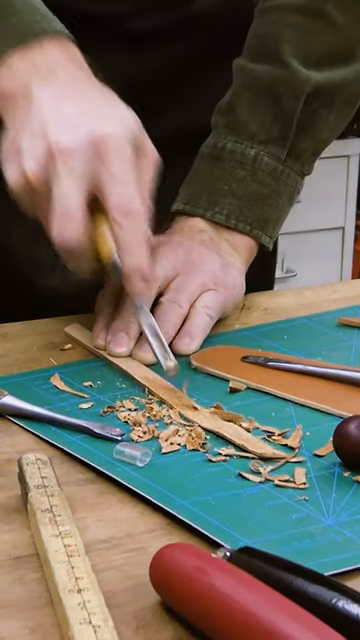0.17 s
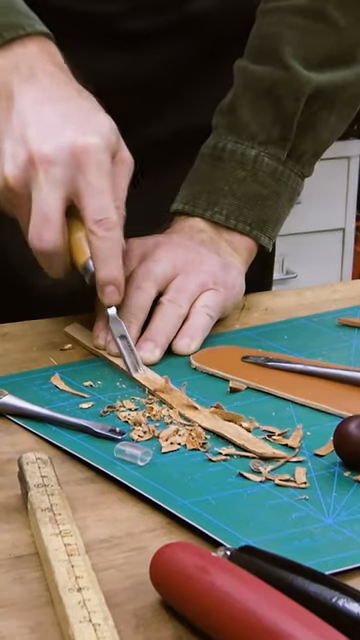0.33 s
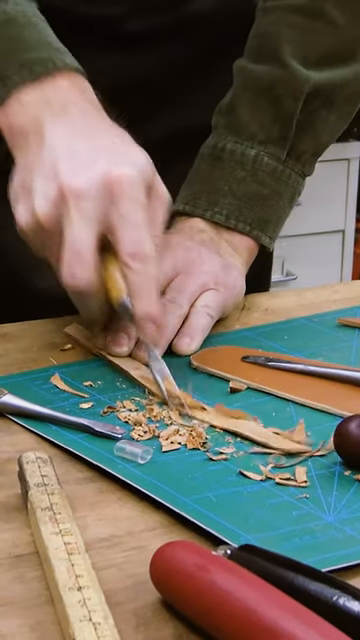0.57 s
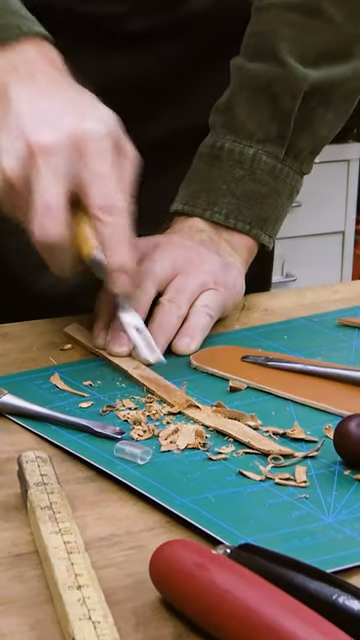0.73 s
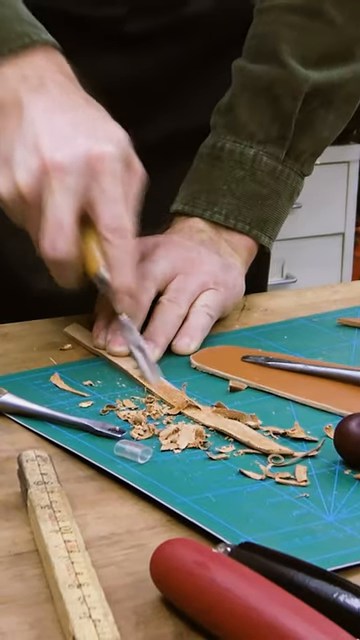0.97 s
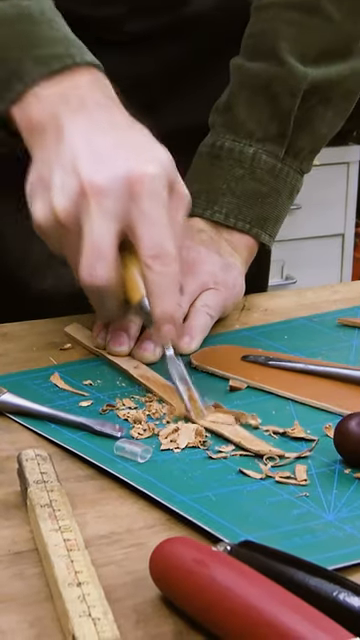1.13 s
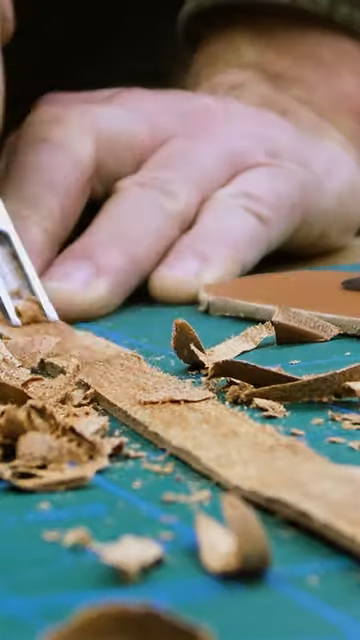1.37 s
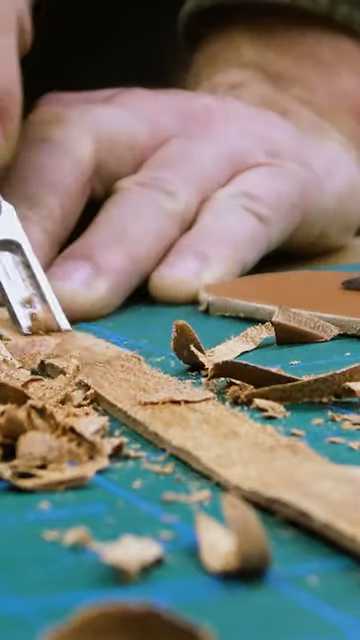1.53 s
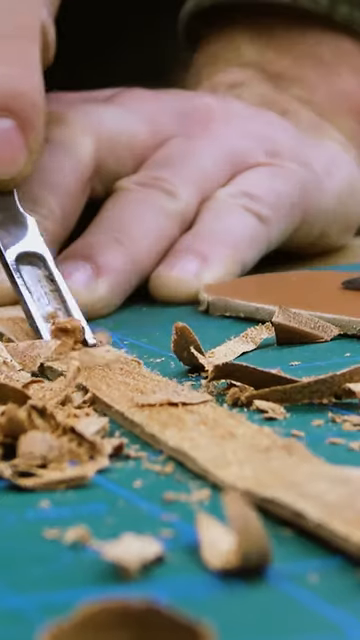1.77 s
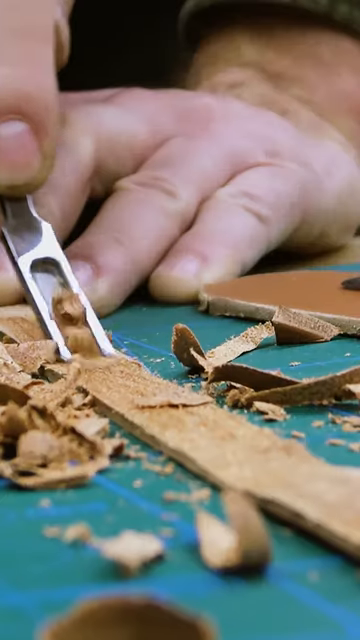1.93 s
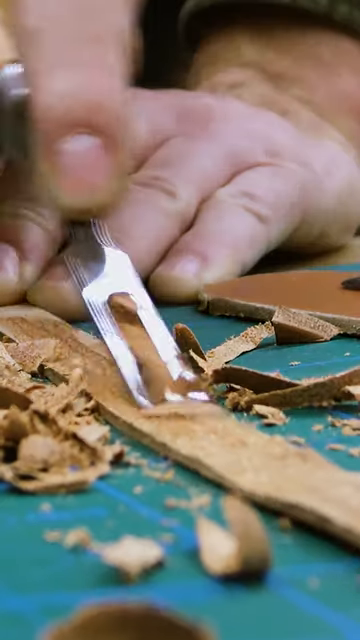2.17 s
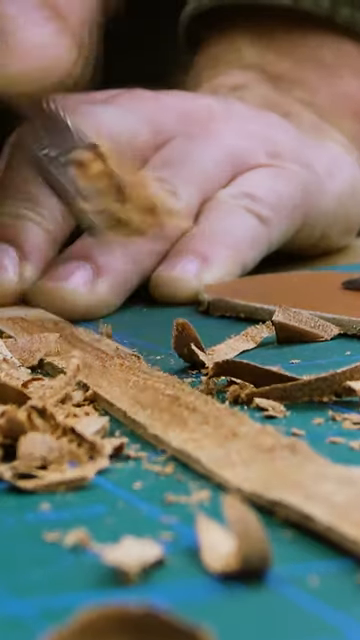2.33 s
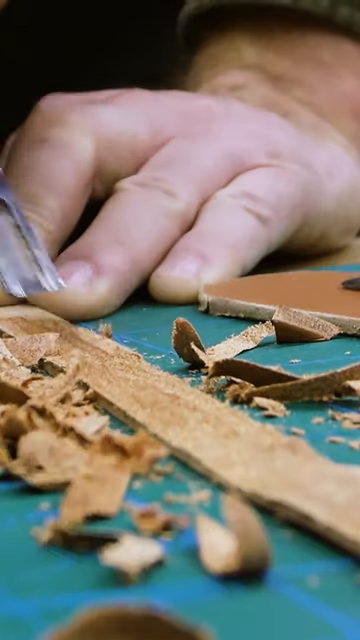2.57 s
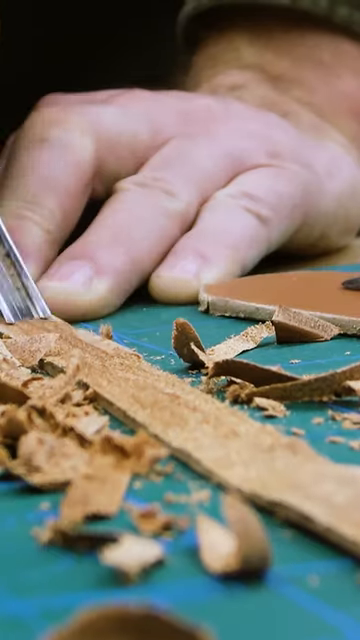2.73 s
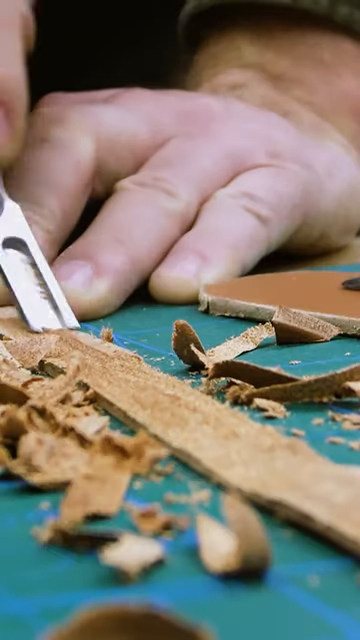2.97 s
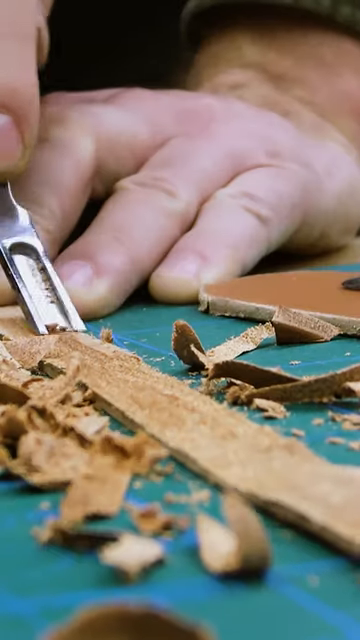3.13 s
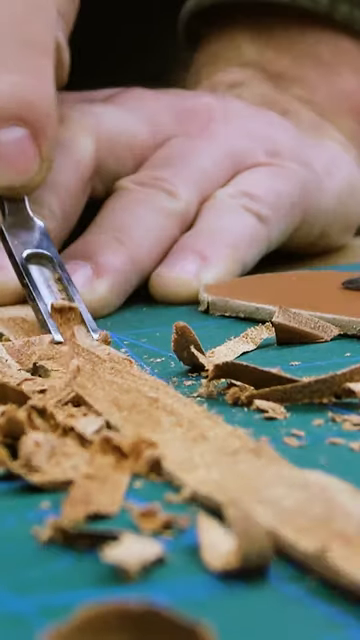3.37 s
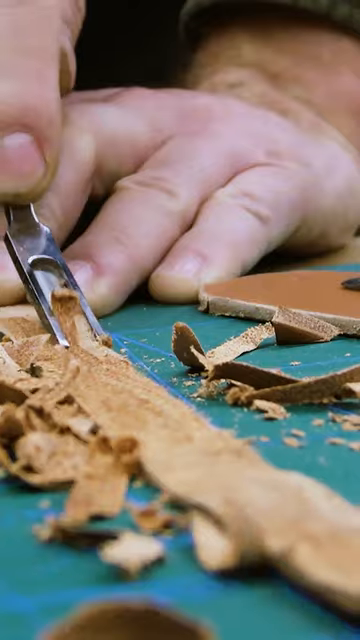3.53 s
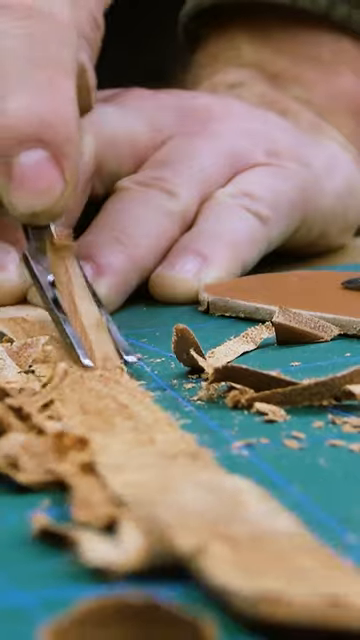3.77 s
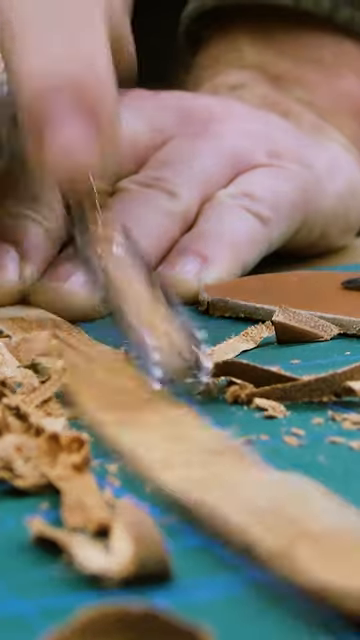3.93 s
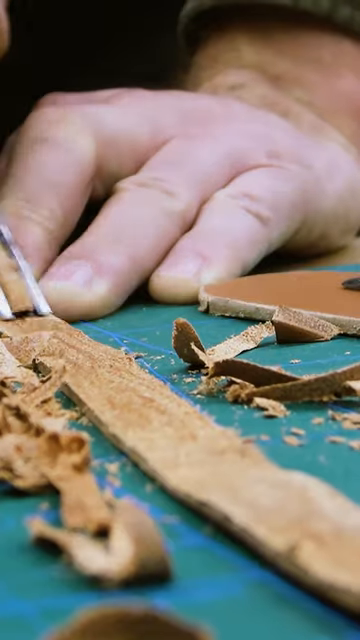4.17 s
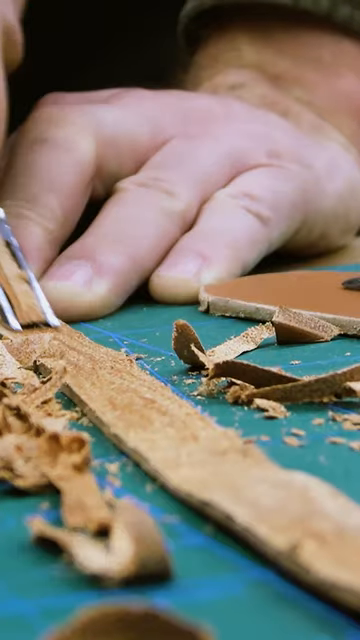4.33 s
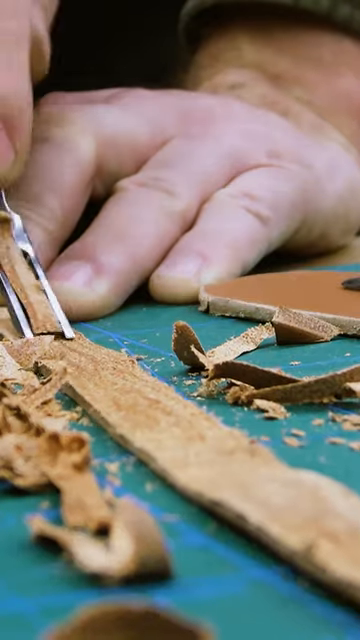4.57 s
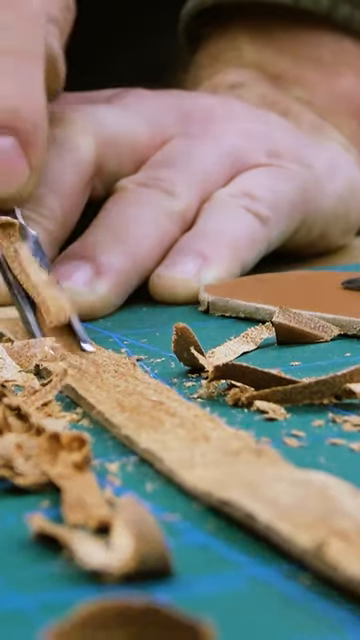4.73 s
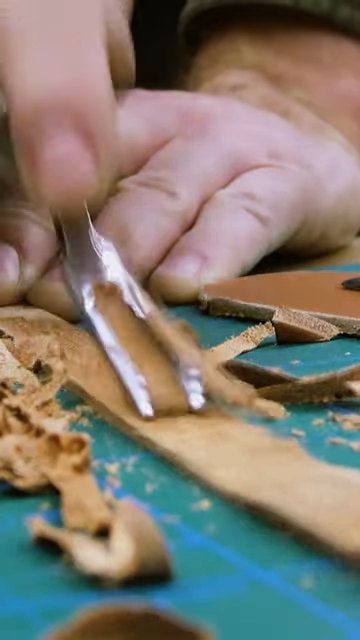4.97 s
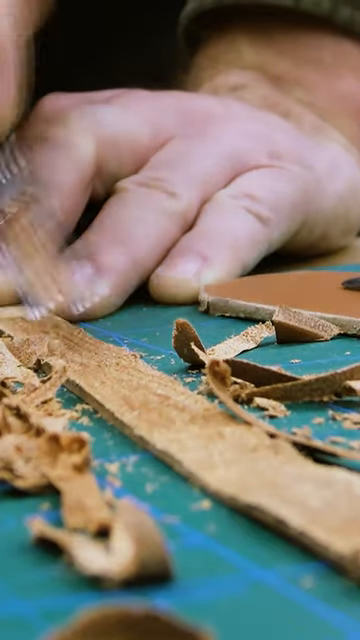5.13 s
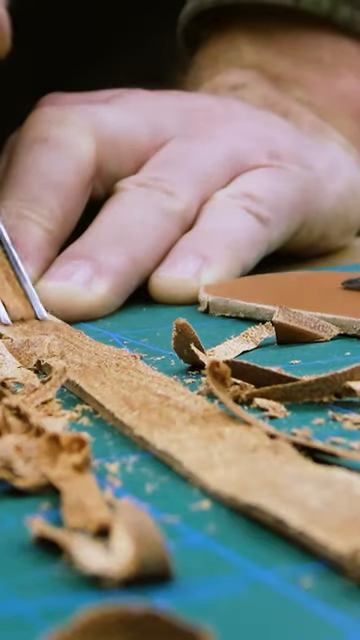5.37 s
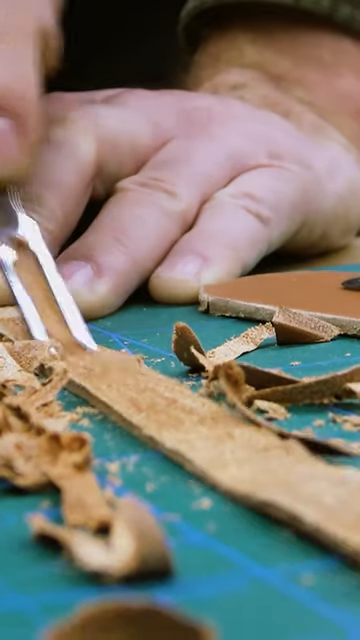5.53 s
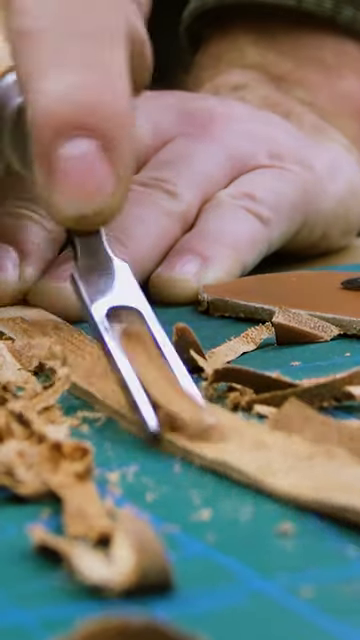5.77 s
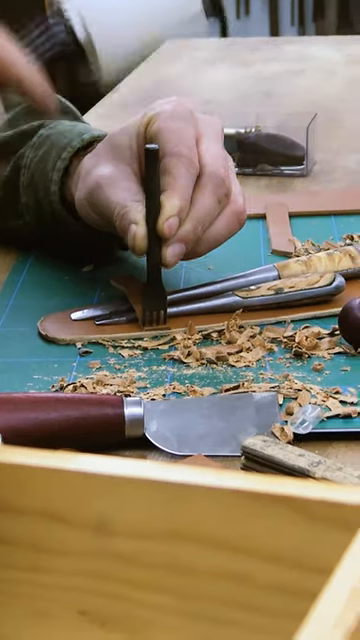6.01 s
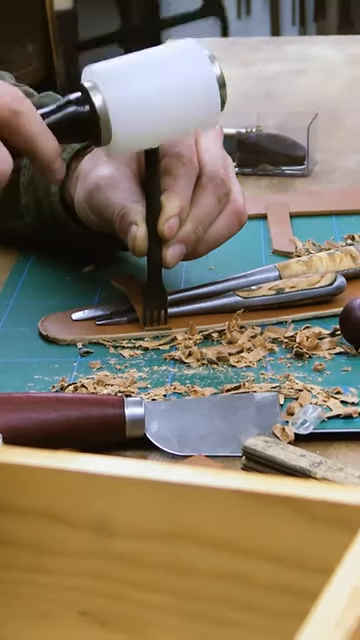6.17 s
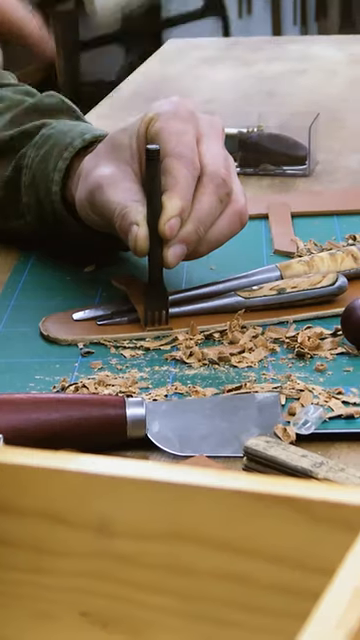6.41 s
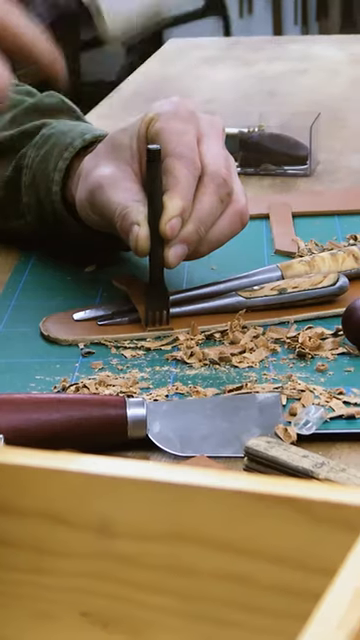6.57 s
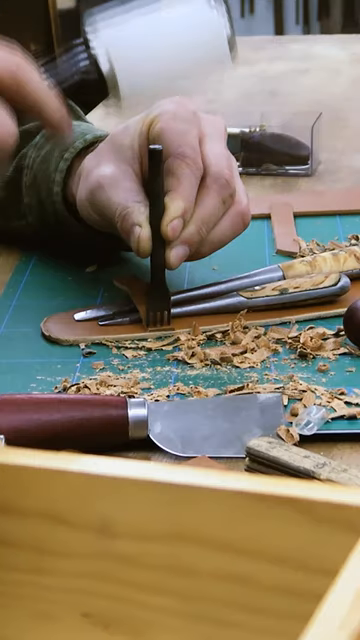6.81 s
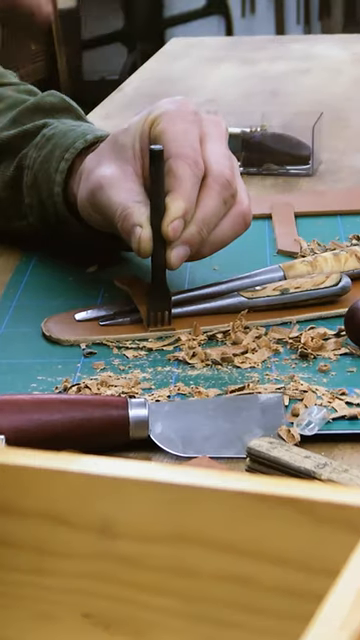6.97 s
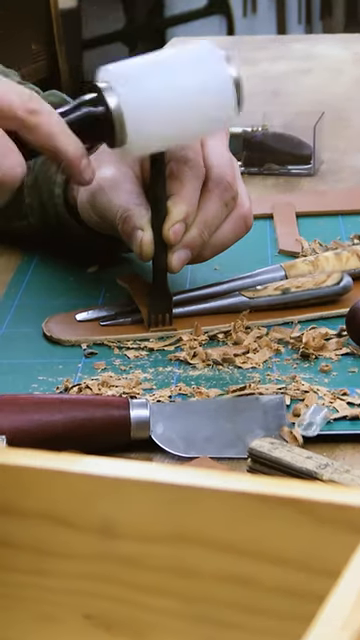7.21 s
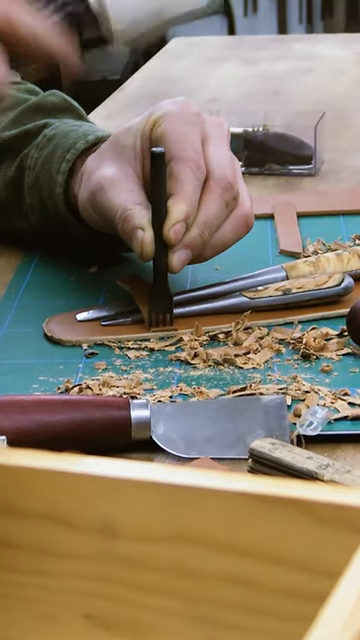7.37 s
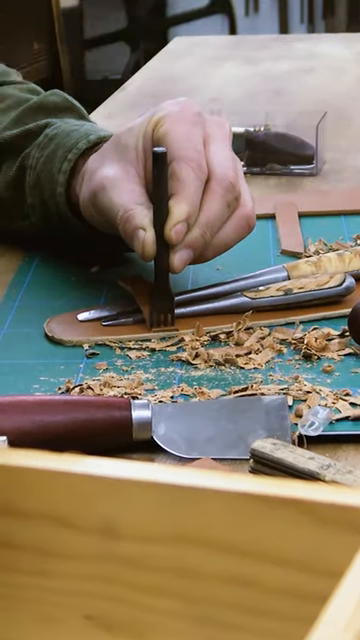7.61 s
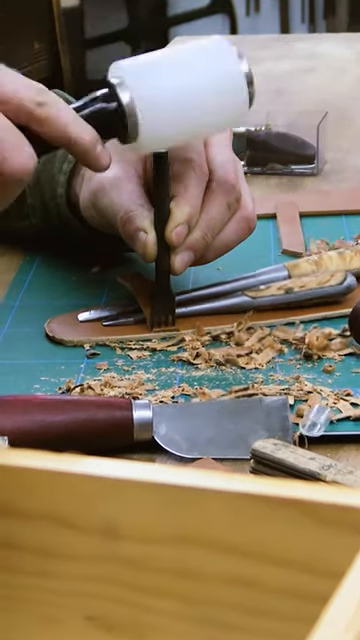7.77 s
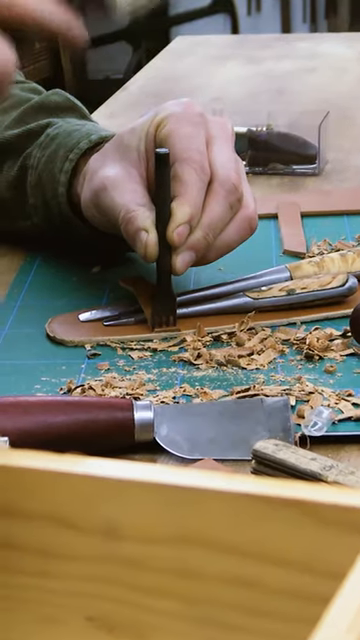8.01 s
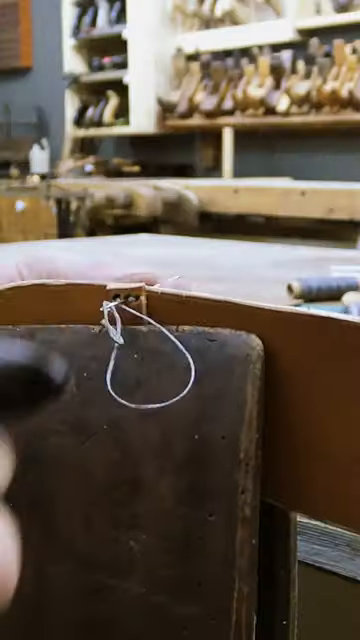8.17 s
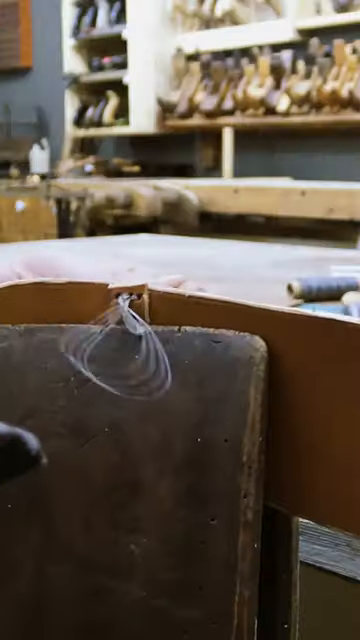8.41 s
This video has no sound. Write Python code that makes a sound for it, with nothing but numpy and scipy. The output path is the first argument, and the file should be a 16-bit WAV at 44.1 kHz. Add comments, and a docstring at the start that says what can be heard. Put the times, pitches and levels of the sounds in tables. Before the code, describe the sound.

Dry scraping cuts through leather on a mat, each closely doubled, followed by four growing mallet knocks on a punch with ringing loose steel.

```python
"""A hand blade shaves a leather strap on a cutting mat in seven strokes, once dragging back lightly,
then a mallet drives a steel punch four times and loose tools jump on the bench. Slipping grains of noise
excite resonances for the blade; shaped noise and decaying sines make the blows; steel rings in sines.
Four sections of a quiet workshop follow one another; two microphones are mixed, the second about 52 ms
late, so every sound comes twice; gain control and a limiter hold the blows."""
import sys
import numpy as np
from scipy import signal
from scipy.fft import rfft, irfft, next_fast_len
from scipy.io import wavfile
from scipy.ndimage import uniform_filter1d, minimum_filter1d, map_coordinates

SR = 44100
rng = np.random.default_rng(int(sys.argv[2]) if len(sys.argv) > 2 else 0)


def wrap_up_sound(samples):
    """Save the sound to the file named by the first command line argument, as 16-bit audio."""
    columns = np.atleast_2d(samples).T
    # keep every value between -1 and 1, then stretch to whole-number steps
    tamed = np.clip(columns, -1, 1)
    steps = np.round(tamed * 32767).astype(np.int16)
    wavfile.write(sys.argv[1], SR, steps)


def gain_from_db(level_db):
    """Turn a decibel level (scalar or array-like) into a linear amplitude factor."""
    decades = np.asarray(level_db, float) / 20
    return 10 ** decades


N = 371763
T = np.arange(N) / SR  # seconds

# Sections of the scene. Each row: start in seconds, lag of the second microphone in ms.
SECTIONS = [(0, 51.7), (1.36, 53.2), (6.09, 52), (8.24, 52)]


def unit(x):
    """Normalization: scales a signal to rms 1."""
    return x / np.sqrt(np.mean(x ** 2) + 1e-20)


def along(points, hz):
    """Logarithmic interpolation: reads (Hz, value) points on a log frequency axis."""
    point_hz, value = np.transpose(points)
    return np.interp(np.log(hz + 1), np.log(point_hz + 1), value)


def filtered(x, response):
    """Linear filtering: multiplies the spectrum by a complex response of frequency."""
    size = next_fast_len(len(x) + 8192)
    spectrum = rfft(x, size) * response(np.fft.rfftfreq(size, 1 / SR))
    return irfft(spectrum, size)[:len(x)]


def resonances(peaks):
    """Modal superposition: causal response of (Hz, width in Hz, dB) resonances of alternating sign."""
    def response(f):
        return sum((-1) ** k * gain_from_db(db) * 1j * f * width / (centre ** 2 - f * f + 1j * f * width)
                   for k, (centre, width, db) in enumerate(peaks))
    return response


def causal(gain):
    """Minimum phase: the folded cepstrum of a gain sampled up to SR / 2 gives its impulse."""
    cepstrum = irfft(np.log(gain + 1e-6))
    half = len(cepstrum) // 2
    cepstrum[1:half] *= 2
    cepstrum[half + 1:] = 0
    return irfft(np.exp(rfft(cepstrum)))[:half]


def add(track, s, sound):
    """Superposition: mixes a sound into the track at s seconds."""
    part = track[round(s * SR):][:len(sound)]
    part += sound[:len(part)]


def ring(modes, scatter_db):
    """Free vibration: exponentially decaying sines, their strengths scattered at random."""
    t = T[:SR]
    return sum(gain_from_db(db + rng.normal(0, scatter_db) - 60 * t / t60) * np.sin(2 * np.pi * hz * t)
               for hz, db, t60 in modes)


def room_tone():
    """Stationary background: Gaussian noise shaped to the spectrum of the quiet workshop."""
    # Spectrum of the room tone. Each row: frequency in Hz, relative level in dB.
    tone_points = [(15, -49), (25, -11), (84, -4), (116, -6), (144, -5), (205, -4.5), (1150, -9),
                   (1470, -11.5), (2890, -16), (5370, -17.5), (15800, -27.5)]
    return unit(filtered(rng.standard_normal(N), lambda f: gain_from_db(along(tone_points, f))))


def room(x, wet_db):
    """Reverberation: direct sound plus noise tails in which each frequency dies at its own speed."""
    # Decay of the room. Each row: frequency in Hz, t60 in seconds.
    decay = [(80, 0.64), (300, .5), (1500, 0.38), (5000, 0.3), (12000, 0.2)]
    out = x.copy()
    block = round(.555 * SR)  # a fresh random tail for each block, so blows do not share one colour
    for start in range(0, N, block):
        source = x[start:start + block]
        if not source.any():
            continue
        hz, t, noise = signal.stft(rng.standard_normal(SR), SR, nperseg=256)
        decay_db = -60 * t / along(decay, hz)[:, None]
        soaked_db = 14 * (hz[:, None] / 12000) ** 2  # the treble is soaked up
        tail = signal.istft(noise * gain_from_db(decay_db - soaked_db), SR, nperseg=256)[1]
        tail *= 1 - np.exp(-np.arange(len(tail)) / SR / 0.0029)  # gradual onset
        add(out, start / SR, gain_from_db(wet_db) * signal.fftconvolve(source, tail / np.linalg.norm(tail)))
    return out


def taps():
    """Impact excitation: small dry contacts, each a short scrape of noise through one steep resonance."""
    # Taps of blade and shavings on the mat. Each row: start in seconds, peak of the dry tap in dB,
    # resonance in Hz, its width in Hz, t60 of the scrape in seconds.
    contacts = [(0.175, -31.5, 5150, 1110, .12), (.634, -8, 1680, 690, 0.0044),
                (.635, -18, 5200, 1600, 0.0044), (0.79, -35, 4930, 1100, 0.11),
                (0.918, -27, 1460, 600, 0.0058), (2.349, -23, 1470, 450, 0.01),
                (2.756, -37.5, 1420, 800, .004), (4.204, -29.5, 1430, 895, 0.0051),
                (5.03, -28, 1500, 500, .007), (5.93, -35, 1580, 597, 0.2), (5.99, -41, 2020, 595, .12),
                (8.172, -38, 6640, 2200, 0.0076), (8.192, -32, 5970, 2210, 0.0085)]
    out, t = np.zeros(N), T[:SR // 5]
    for s, db, hz, width, t60 in contacts:
        scrape = gain_from_db(-60 * t / t60) * rng.standard_normal(len(t))
        narrow, wide = resonances([(hz, width, 0)]), resonances([(hz, 3 * width, 0)])
        tap = filtered(scrape, lambda f: narrow(f) * wide(f) ** 2)
        add(out, s, gain_from_db(db) * tap / abs(tap).max())
    return out


def clinks():
    """Modal ringing: the jolted steel lands and rings at its own lightly damped frequencies."""
    # Three loose steel tools and the punch, a list of modes for each.
    # Each row: frequency in Hz, level in dB, t60 in seconds.
    steel = [
        [(6422, 0, .18), (8070, -3, .27)],
        [(8349, 0, .3)],
        [(4716, 0, .5), (7682, -7, .3)],
        [(11500, 0, .8), (11680, -1, 1.1)],
    ]
    # Landings of each piece after a jolt, a list for each. Each row: start in seconds, level in dB.
    landings = [
        [(6.184, -40), (6.748, -32.5), (7.265, -26), (7.87, -46)],
        [(6.748, -56), (7.265, -18.5), (7.87, -28.5)],
        [(7.3, -40), (7.376, -34), (8.0, -57)],
        [(6.748, -62), (7.265, -47), (7.376, -66)],
    ]
    out = np.zeros(N)
    for modes, times in zip(steel, landings):
        for s, db in times:
            add(out, s, gain_from_db(db) * ring(modes, scatter_db=0))
    return out


def mallet():
    """Impact radiation: a crack, a knock through punch and bench, rattling objects and low modes."""
    # Mallet blows. Each row: start in seconds, strength in dB, brightness in dB per octave,
    # clack of the punch in Hz, height of the clack in dB.
    blows = [(6.172, 1.5, -3, 2220, 4), (6.724, 12, -3.5, 1410, 0.5), (7.217, 22.5, -2, 3220, 6.5),
             (7.813, 26, -2.2, 2570, 6.5)]
    # Spectrum of the knock. Each row: frequency in Hz, relative level in dB.
    knock_points = [(29, -47), (50, -33.5), (253, -8.5), (292, -4), (460, -5.5), (598, -3.5), (643, -4),
                    (742, -3), (1630, -9), (3030, -16.5), (5770, -26), (8260, -29.5), (15000, -53)]
    # Spectrum of the crack. Each row: frequency in Hz, relative level in dB.
    crack_points = [(300, -30.5), (1200, -2.5), (2500, 3), (6000, -7), (15000, -20)]
    # Low modes of bench and room. Each row: frequency in Hz, mean relative level in dB, t60 in seconds.
    boom = [(72, -17.5, 0.87), (114, -15, 0.57), (165.4, -7.5, 0.24), (192.7, -12, 0.34),
            (222.6, -9.5, 0.34), (283.8, -9.5, 0.42), (356, -12, 0.3)]
    out, hz, t = np.zeros(N), np.fft.rfftfreq(4096, 1 / SR), T[:SR // 2]
    jingle_db = 7 * np.exp(-(np.log2((hz + 1) / 7000) / 0.38) ** 2)  # small steel shaking on the bench
    for s, db, bright_db, clack_hz, clack_db in blows:
        tilt_db = bright_db * np.log2((hz + 1) / 700)
        clack = clack_db * np.exp(-(np.log2((hz + 1) / clack_hz) / 0.24) ** 2)
        knock = causal(gain_from_db(along(knock_points, hz) + tilt_db + clack + jingle_db))
        # a click, then noise with a fast and a slow decay
        rattle = (gain_from_db(-23.5 - 60 * t / 0.28) + gain_from_db(-15 - 60 * t / 0.027)) * rng.standard_normal(len(t))
        rattle[0] = 1
        snap = gain_from_db(-60 * t / .009) * rng.standard_normal(len(t))
        # brightness shapes the crack more steeply than the knock
        crack = causal(gain_from_db(along(crack_points, hz) + 2.82 * tilt_db + 1.5 * clack))
        add(out, s, gain_from_db(db) * signal.fftconvolve(rattle, knock / np.linalg.norm(knock)))
        # crack and low modes grow less than the knock
        add(out, s, gain_from_db(0.62 * db - 3.5) * signal.fftconvolve(snap, crack / np.linalg.norm(crack)))
        add(out, s, gain_from_db(0.61 * db - 21) * ring(boom, scatter_db=2.5))
    return out


def slips(spread_db, chatter_db, chatter_rate):
    """Stick-slip friction: grains of uneven size, in clumps as the edge chatters (rate in knots per s)."""
    knots = rng.standard_normal(N)
    chatter = map_coordinates(knots, [T * chatter_rate])
    grains, sizes = rng.standard_normal((2, N))
    return grains * gain_from_db(spread_db * sizes + chatter_db * chatter)


def pressure_db(stroke, t, touch_db_s, lift_db_s):
    """Contact force: the curve of a stroke, with its build-up before and its release after."""
    s, db = np.transpose(stroke)
    build_up = touch_db_s * np.maximum(s[0] - t, 0)
    release = lift_db_s * np.maximum(t - s[-1], 0)
    return np.interp(t, s, db) - build_up - release


def skiving():
    """Friction-driven resonance: the slipping edge rumbles the bench, tears fibres, makes the blade sing."""
    # Strokes, each a list from touch-down to lift-off.
    # Each row: time in seconds, pressure of the edge as bench rumble in dB.
    strokes = [
        [(0, -25), (.06, -24), (.085, -30.5)],
        [(.49, -32), (.575, -24.5), (.615, -29)],
        [(1.065, -26), (1.13, -30)],
        [(1.485, -39), (1.66, -32.5), (1.755, -29.5), (1.8, -35), (1.99, -30.5), (2.12, -31), (2.24, -30),
         (2.3, -37.5)],
        [(2.955, -38.5), (3.05, -36.5), (3.11, -45.5), (3.19, -44), (3.23, -38.5), (3.46, -37), (3.785, -28),
         (3.87, -32)],
        [(4.42, -41), (4.56, -41.5), (4.72, -29), (4.86, -24.5), (4.92, -28.5)],
        [(5.15, -56.5), (5.33, -60)],
        [(5.46, -39.5), (5.63, -29), (5.765, -27), (5.87, -53), (6.0, -54)],
    ]
    # Make-up of each stroke. Each row: tearing fibres in dB and blade hiss in dB over the bench rumble
    # at a firm push, touch-down in dB per second, lift-off in dB per second.
    cuts = [(-9, -16.5, 200, 298), (-8.5, -15.5, 189, 327), (-8, -16, 195, 266), (-11, -16, 217, 260),
            (-12.5, -19.5, 309, 205), (-10, -13.5, 200, 220), (-14, -29, 200, 200), (-8.5, -16.5, 231, 206)]
    # Mat and bench under the blade, in the first section and in the others.
    # Each row: resonance in Hz, width in Hz, relative level in dB.
    bench_far = [(260, 160, -7.5), (344, 97, 0.5), (722, 170, 0.5), (1010, 89, 1.5), (1216, 120, -0.5),
                 (1500, 130, -4.5), (1850, 160, -16.5)]
    bench_near = [(69, 17, -16), (151, 78, -6), (368, 97, -2.5), (691, 148, -1.5), (1030, 148, -3),
                  (1284, 136, -6.5), (1552, 108, -6)]
    # Spectrum of tearing fibres. Each row: frequency in Hz, relative level in dB.
    fibre_points = [(1200, -0.5), (2000, 0), (3000, -3.5), (4200, -6.5), (5500, -16), (9000, -16),
                    (14000, -32)]
    # Resonances of the blade. Each row: frequency in Hz, width in Hz, relative level in dB.
    blade_peaks = [(5950, 1050, 5), (7300, 560, 6.5), (8300, 160, 2), (10500, 1900, -39)]
    # The edge sticks and the blade's singing dips.
    # Each row: centre in seconds, half-length in seconds, depth in dB.
    sticks = [(1.586, 0.04, 18), (1.787, .04, 16), (2.248, 0.12, 5), (3.102, 0.063, 18), (3.892, 0.042, 12),
              (4.53, .04, 10), (4.92, 0.073, 8), (5.843, 0.094, 3)]
    firm_db = -32
    fibres_grow, blade_grows = 1.12, 1.04  # dB per dB of pressure, around a firm push
    fibres_lag_s, blade_lead_s = 0.0061, 0.0083  # the blade sings as it bites and is silent first

    push = slips(spread_db=5.5, chatter_db=3.0, chatter_rate=60)
    far = unit(filtered(push, resonances(bench_far)))
    near = unit(filtered(push, resonances(bench_near)))
    bench = np.where(T < SECTIONS[1][0], far, near)

    tearing = slips(spread_db=4.5, chatter_db=2.5, chatter_rate=70)
    fibres = unit(filtered(tearing, lambda f: gain_from_db(along(fibre_points, f))))

    song = slips(spread_db=5, chatter_db=4, chatter_rate=40)
    blade = unit(filtered(song, lambda f: resonances(blade_peaks)(f) * f / (f + 9000)))
    blade = blade * gain_from_db(-sum(db * np.exp(-((T - s) / length) ** 4) for s, length, db in sticks))

    out = np.zeros(N)
    for stroke, (fibre_db, blade_db, *rates) in zip(strokes, cuts):
        fibre_push = pressure_db(stroke, T - fibres_lag_s, *rates) - firm_db
        blade_push = pressure_db(stroke, T + blade_lead_s, *rates) - firm_db
        out += bench * gain_from_db(pressure_db(stroke, T, *rates))
        out += fibres * gain_from_db(fibre_db + firm_db + fibres_grow * fibre_push)
        out += blade * gain_from_db(blade_db + firm_db + blade_grows * blade_push)
    return out


def ducking_db(x, top_db, hold, release_db_s):
    """Peak control: gain that keeps peaks under the top and climbs back at a fixed rate."""
    need = np.minimum(top_db - 20 * np.log10(abs(x) + 1e-9), 0)
    ramp = release_db_s * T
    return np.minimum.accumulate(minimum_filter1d(need, hold) - ramp) + ramp


def limited(x, top_db, ahead_ms, release_db_s):
    """Look-ahead limiting: the gain drops just before a peak."""
    size = round(ahead_ms * SR / 1000)
    return x * gain_from_db(uniform_filter1d(ducking_db(x, top_db, 2 * size + 1, release_db_s), size))


def microphone(x, top_db, react_ms, release_db_s):
    """Delayed gain control and saturation: it reacts late, so the front of a blow clips softly."""
    late = max(round(react_ms * SR / 1000), 1)
    gain_db = uniform_filter1d(ducking_db(x, top_db, 3, release_db_s), size=21)
    over = x * gain_from_db(np.pad(gain_db, (late, 0))[:N] - top_db)  # 1 = the top
    clipped = gain_from_db(top_db) * over / (1 + over ** 4) ** (1 / 4)

    def band(f):
        low_cut = (1j * f / (40 + 1j * f)) ** 2
        return low_cut / (1 + 1j * f / 11000) / (1 + (f / 14500) ** 8)
    return filtered(clipped, band)


def scene():
    """Delayed superposition: both microphones hear each section, which ends at its cut."""
    # Balance of each section. Each row: gain of the first microphone in dB, of the second in dB,
    # treble lift of the second in dB, room tail of the second in dB, room tone in dB.
    balance = [(-4, .5, 3.5, -7.5, -54), (-1.42, -3.5, 3, -10, -56), (0.5, -0.5, 5, -5.5, -56.5),
               (-7, -6, 1.5, -8, -54.5)]
    tone = room_tone()
    sources = taps() + clinks() + mallet() + skiving()
    # the microphones drop the deep bass
    sources = filtered(sources, lambda f: (1j * f / (85 + 1j * f)) ** 2)
    out = np.zeros(N)
    ends = [start for start, _ in SECTIONS[1:]] + [N]  # the last end lies beyond the scene
    for (start, lag_ms), end, levels in zip(SECTIONS, ends, balance):
        first_db, late_db, lift_db, wet_db, tone_db = levels
        section = (T >= start) & (T < end)
        heard = sources * section
        bright = filtered(heard, lambda f: (1500 + 1j * f * gain_from_db(lift_db)) / (1500 + 1j * f)) * section
        first = microphone(room(heard, wet_db + 1.5), top_db=-5.5, react_ms=1.57, release_db_s=212)
        second = microphone(room(bright, wet_db), top_db=-4.5, react_ms=2.0, release_db_s=227)
        late = np.pad(second, (round(lag_ms * SR / 1000), 0))[:N]
        # the second microphone has opposite polarity
        out += section * (gain_from_db(first_db) * first - gain_from_db(late_db) * late + gain_from_db(tone_db) * tone)
    return out[None]


def low_pass(x):
    """Removes everything above the highest recorded frequency."""
    return signal.sosfilt(signal.butter(12, 16330, fs=SR, output="sos"), x)


def record(dry):
    """Dynamic range control: a last fast limiter holds the peaks of the finished mix."""
    held = limited(dry[0], top_db=-7.3, ahead_ms=4, release_db_s=400)
    return low_pass(held[None])


dry = scene()
out = record(dry)
wrap_up_sound(out)
```